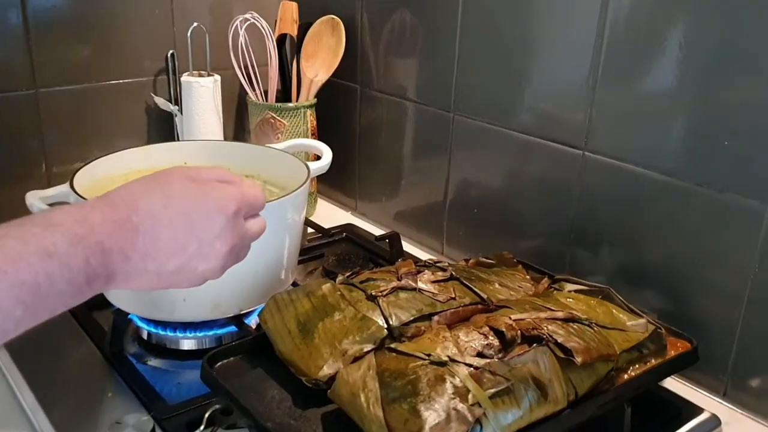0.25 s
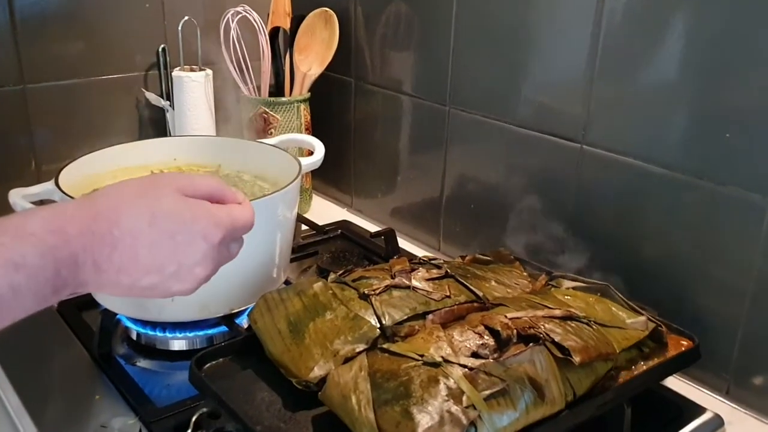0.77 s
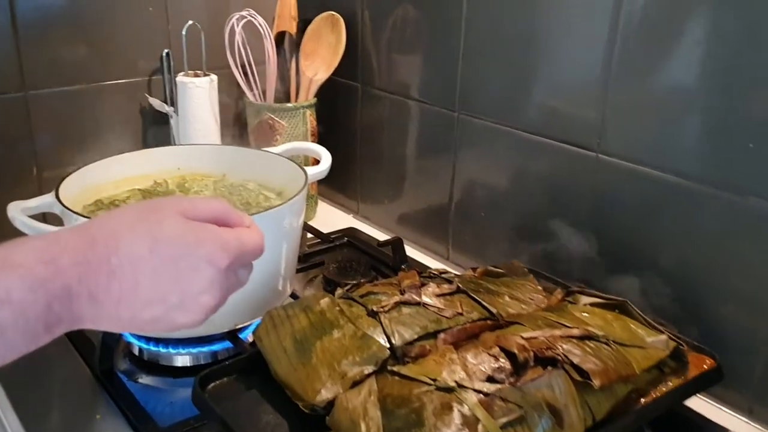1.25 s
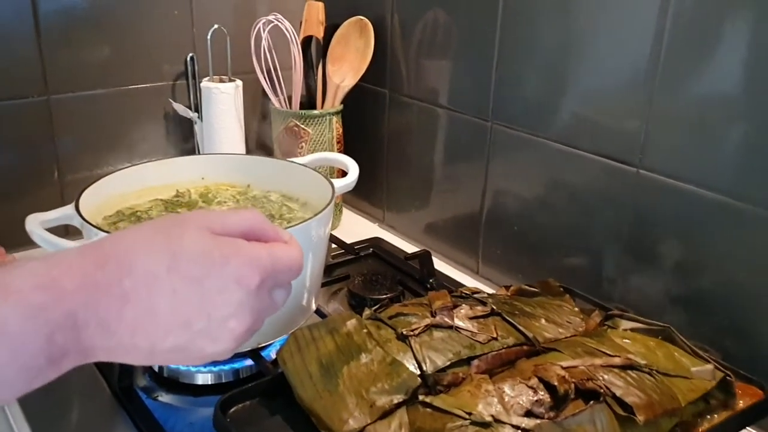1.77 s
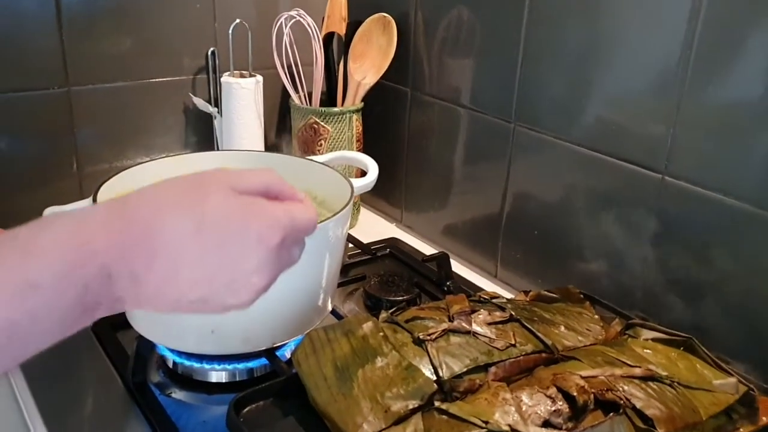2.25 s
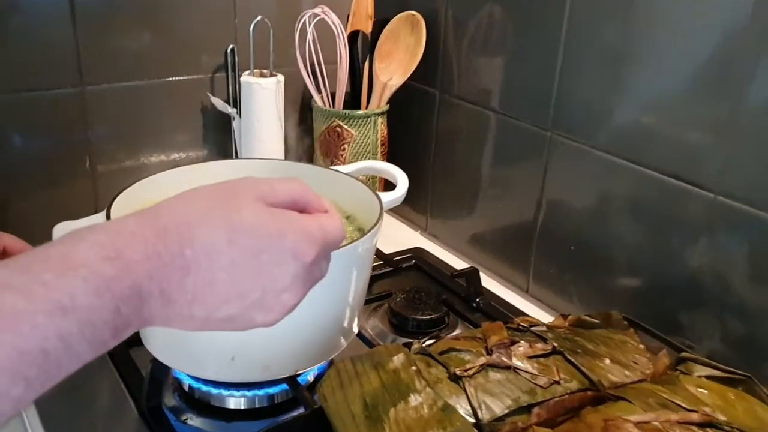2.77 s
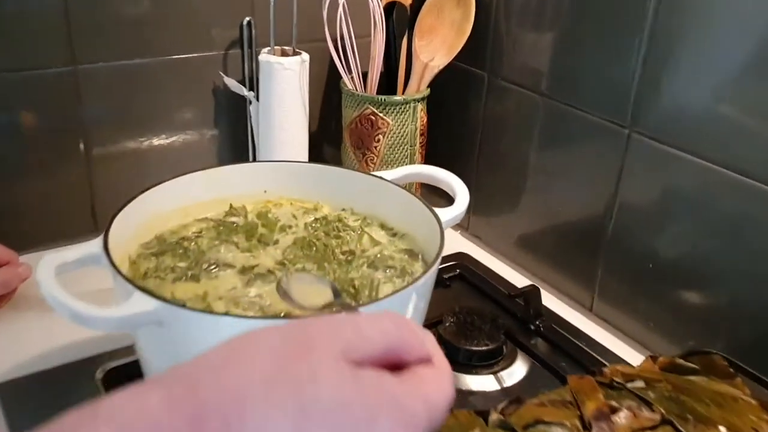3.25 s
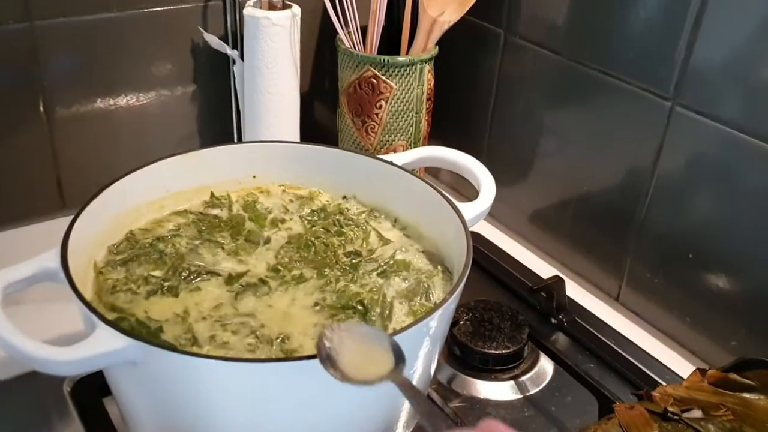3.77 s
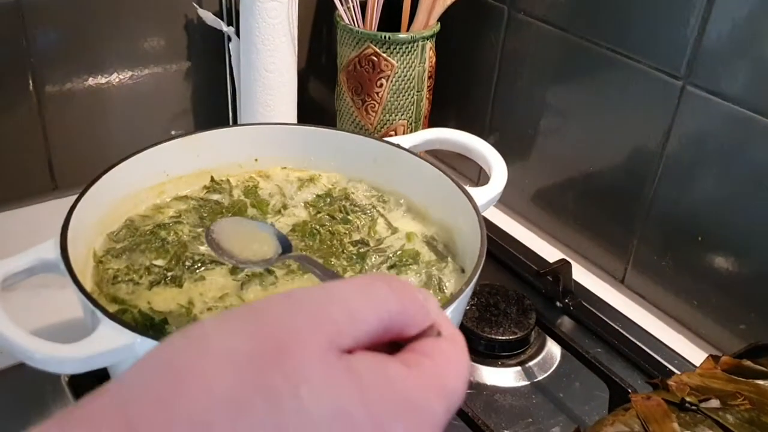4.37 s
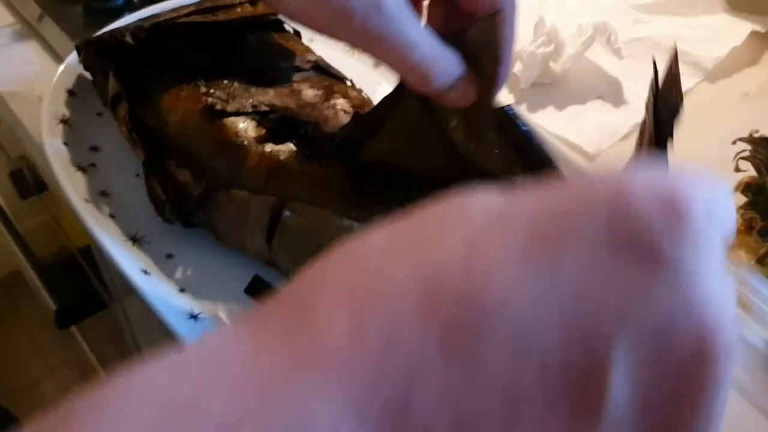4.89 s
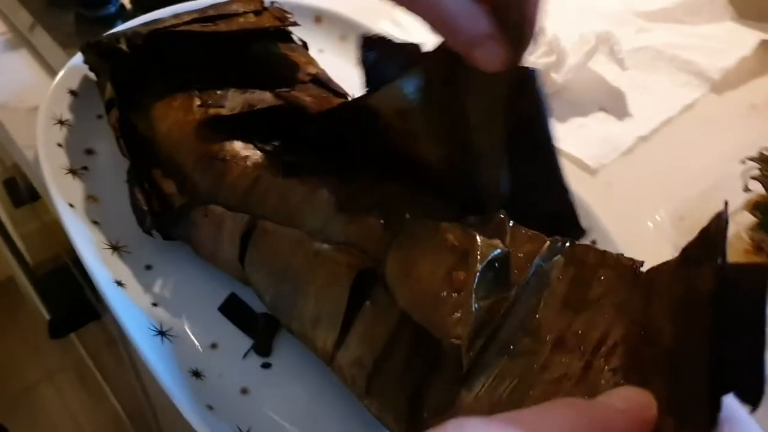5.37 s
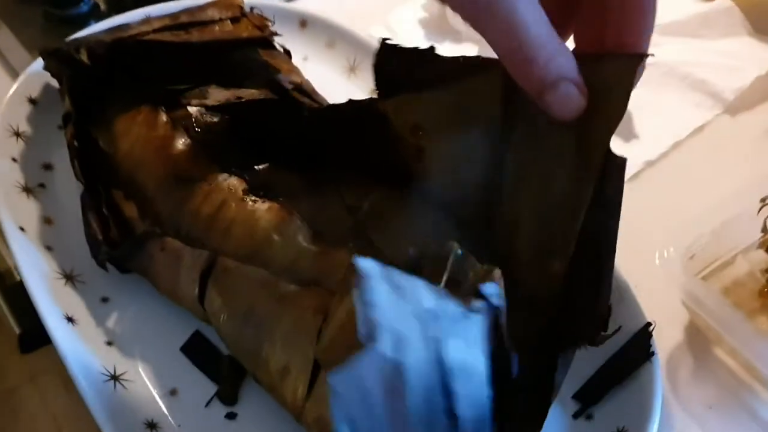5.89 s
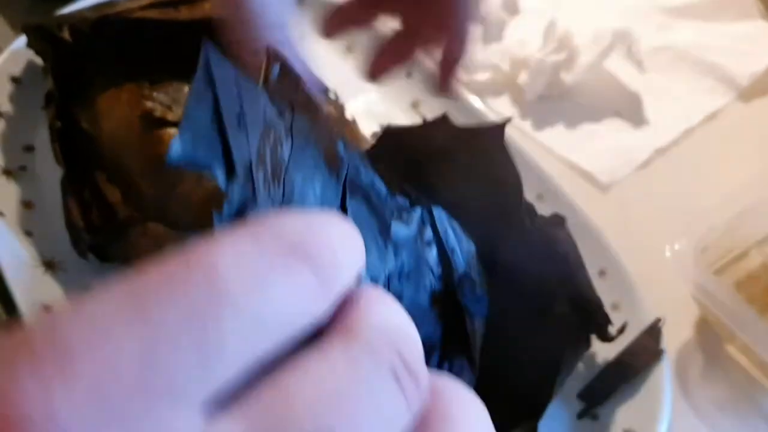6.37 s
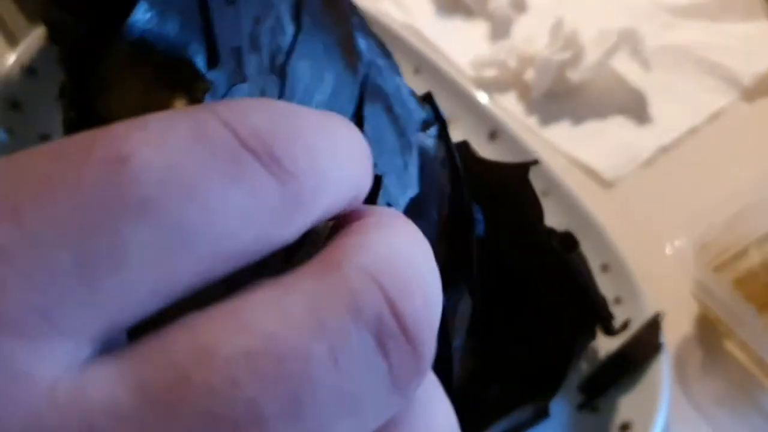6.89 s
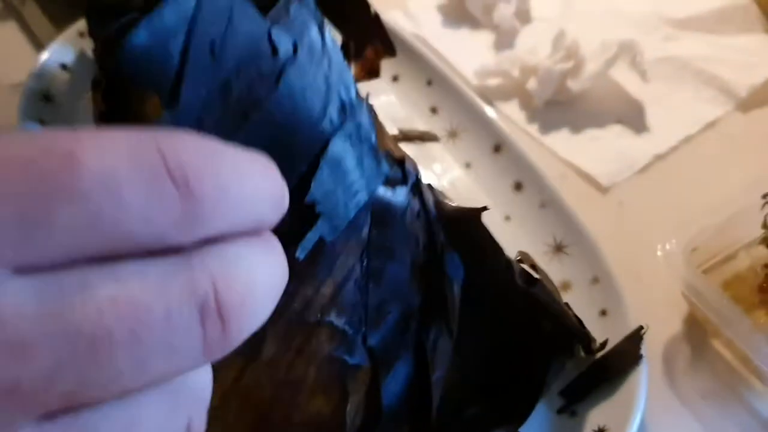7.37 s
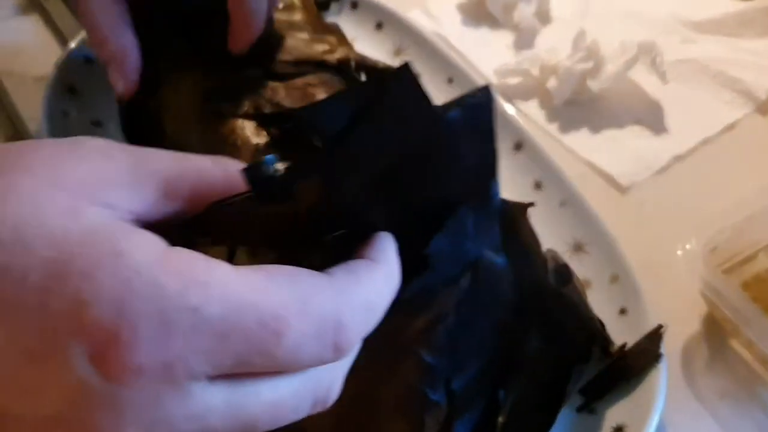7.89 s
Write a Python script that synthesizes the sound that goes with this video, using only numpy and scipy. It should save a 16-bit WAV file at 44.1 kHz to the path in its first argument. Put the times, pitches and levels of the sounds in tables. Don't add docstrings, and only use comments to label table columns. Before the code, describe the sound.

Soft gas hiss and simmer in a tiled kitchen, a sudden loud metal clatter, light ticks and a wooden knock, then close crisp leaf snapping.

```python
import sys
import numpy as np
from scipy import signal
from scipy.io import wavfile

SR = 44100
rng = np.random.default_rng(int(sys.argv[2]) if len(sys.argv) > 2 else 0)


def gain_from_db(level_db):
    decades = np.asarray(level_db, float) / 20
    return 10 ** decades


def wav_out(sig):
    wavfile.write(sys.argv[1], SR, np.round(np.clip(np.atleast_2d(sig).T, -1, 1) * 32767).astype(np.int16))


N = 358533

# [from f/Hz, to f/Hz]
BLOW_BANDS = [(200, 700), (700, 2600), (2600, 7000), (7000, 14600)]
# [from f/Hz, to f/Hz]
KNOCK_BANDS = [(140, 450), (450, 1450), (1450, 4500), (4500, 16000)]
HARDNESS_SHARE = [0.002, .6, .95, 1.05]

TUMBLE = [(0.612, -14, 0.5), (0.624, -19, -6.5), (0.659, -31.5, -1), (0.721, -12.5, -6.5),
          (0.789, -37.5, 7), (0.874, -15.5, -1), (0.907, -18, 4.5), (0.959, -26, -12), (0.999, -34, -1.5)]
# [t/s, level/dB, hardness/dB]
JOSTLE = [(1.071, -28, 23.5), (1.111, -17.5, -11), (1.203, -17.5, 1.5), (1.257, -18.5, 4.5),
          (1.3, -38, -1.5), (1.339, -18, 2)]
# [t/s, level/dB, hardness/dB]
DROP = [(1.404, -15, -12), (1.4205, -10.5, 11), (1.433, -5.5, -4.5), (1.451, -15, 0), (1.469, -14, -5),
        (1.498, -18, 0), (1.539, -24, 5)]
# [t/s, level/dB, hardness/dB]
BOUNCES = [(1.58, -19, -16), (1.657, -18.5, -16), (2.19, -31, -16), (2.249, -27.5, -25)]
# [t/s, level/dB, hardness/dB]
BRUSH = [(.045, -48, 6.5), (.06, -43.5, 0.55)]
# [t/s, level/dB, hardness/dB]
TICKS = [(3.266, -41, 10), (3.359, -37.5, -17), (3.475, -48, -9)]
# [t/s, level/dB, hardness/dB]
KNOCKS = [(3.969, -58.5, 15), (4.118, -38.5, 0.5), (4.167, -22, -2.5), (4.205, -26, -7)]
# [t/s, level/dB, hardness/dB]
DISH = [(6.631, -53, 0.5), (6.876, -51, 2.5), (7.204, -44, 4.5), (7.219, -39, -18), (7.544, -34, -10),
        (7.589, -33.5, -25), (7.657, -35.5, -27), (7.699, -38.5, -13), (8.119, -45, -12.5)]

UTENSIL_MODES = [(310.5, -6.5, 0.057), (419, -5, 0.026), (595, -4, 0.076), (700, -3.5, 0.072),
                 (1010, -3.5, 0.051), (1257, -1.5, 0.034), (2100, -15.5, 0.04), (2920, -17.5, 0.027),
                 (5200, -10.5, 0.023), (7010, -2.5, 0.031), (9600, -5, 0.028), (10230, -7, 0.025)]
# [f/Hz, level/dB, t60/s]
TRAY_MODES = [(205.6, -26.5, 0.015), (297, -26.5, 0.081), (298, -9.5, 0.043), (515, -19.5, 0.067),
              (1100, -1.5, 0.021), (1240, -15, 0.025), (1350, 4, 0.03), (1500, -5, 0.033),
              (2073, -11, 0.073), (2400, -0.5, 0.0068), (3800, -8, 0.02), (6400, -4, 0.044)]
# [f/Hz, level/dB, t60/s]
DROPPED_MODES = [(96, -13.5, 0.094), (200, -2, 0.044), (299, -5.5, 0.22), (381, -10, 0.078),
                 (980, -5, 0.012), (2120, -10, 0.026), (3840, 6.5, 0.0044)]
# [f/Hz, level/dB, t60/s]
WIRE_MODES = [(430, -11.5, 0.037), (727, -0.5, 0.018), (940, -2.5, 0.047), (5260, -5.5, 0.056),
              (5510, -14, .03), (7000, -6, 0.048)]
# [f/Hz, level/dB, t60/s]
SPOON_MODES = [(1250, -6, .025), (1550, 0, .022), (1890, -1, .02), (3230, -3, .018), (4400, -7, .01),
               (5850, -6, .01), (8100, -3, .012)]
# [f/Hz, level/dB, t60/s]
WOOD_MODES = [(200, -6, .04), (500, -3, .025), (640, -3, .02), (820, -2, .02), (1040, -6, .015),
              (1300, -12, .015), (2500, -7, .01), (3400, -5, .012)]

# [start t/s, hold t/s, drum tone level/dB]
WOBBLE = [(1.865, 0.2, -36.5), (2.147, .01, -45.5), (2.237, 0.083, -39), (2.416, .01, -51)]
# [t/s, peak level/dB, final f/Hz]
HOLLOWS = [(0.91, -40, 1240), (1.073, -24, 1300), (1.256, -21, 1308), (1.338, -19, 1272),
           (1.654, -26, 1320), (1.723, -24, 1320), (1.776, -21.5, 1334), (1.82, -27, 1290),
           (1.875, -28, 1346)]
# [t/s, peak level/dB, f/Hz,
# t60/s]
RINGING = [(.613, -19, 489.5, 0.073), (.62, -29.5, 693, 0.24), (.718, -10.5, 360, 0.056),
           (.785, -27.5, 340, 0.26), (.876, -28, 765, 0.099), (0.913, -24, 432, 0.19),
           (.955, -22.5, 413, 0.18), (0.906, -27.5, 1678, 0.24), (0.958, -36, 1190, 0.13),
           (1.074, -28.5, 297, 0.15), (1.107, -32.5, 299, 0.34), (1.202, -24, 336, 0.064),
           (1.205, -30.5, 710, 0.089), (1.259, -32, 304, 0.32), (1.262, -23.5, 753, 0.078),
           (1.34, -26, 314, 0.065), (1.343, -24.5, 756, 0.089), (1.338, -39.5, 5200, 0.09),
           (3.267, -36, 1630, .06), (3.265, -37, 3260, 0.027), (3.267, -32, 4500, .04),
           (3.268, -36, 5900, .04), (3.293, -46, 3210, .08), (3.31, -37, 1200, .06), (3.48, -48, 1320, .1),
           (3.665, -42, 3750, 0.065), (1.721, -32, 2240, 0.11), (1.776, -32.5, 2293, 0.11),
           (1.822, -35, 2180, .12), (1.862, -43, 2130, 0.08), (1.721, -43, 3800, .08),
           (1.78, -44, 3800, .1), (1.421, -16.5, 2680, 0.058), (1.658, -25, 1443, 0.092),
           (1.58, -30.5, 217, 0.19), (1.658, -40, 203, 0.18), (1.721, -35, 230, 0.29),
           (1.78, -36.5, 200, 0.2), (1.861, -30.5, 238, 0.15), (1.958, -50, 200, 0.36),
           (2.201, -44, 1028, 0.33), (3.352, -40, 1770, 0.087), (3.598, -37.5, 3800, 0.073),
           (4.118, -31, 700, 0.08), (4.168, -40, 3340, 0.045), (6.632, -39, 670, 0.045),
           (7.2, -58, 1210, 0.14), (7.212, -40, 813, 0.075), (7.218, -40.5, 2480, 0.068),
           (.613, -34, 7150, .2), (0.872, -35, 6800, 0.14), (.874, -36.5, 10000, .04),
          (0.905, -30.5, 5200, 0.15), (0.909, -37, 7150, 0.21), (1.073, -32, 8100, .035),
          (1.203, -36.5, 7050, .06), (1.256, -39.5, 5320, 0.23), (2.191, -53, 5260, 0.29)]
# [t/s, peak level/dB, f/Hz, swell t/s]
BUMPS = [(2.485, -43, 205, .012), (2.53, -36, 200, .016), (2.535, -49, 395, .025), (3.662, -30, 72, .015),
         (3.715, -36, 72, .012), (6.37, -46, 55, .02), (6.435, -46, 130, .008), (6.343, -50, 150, .01),
         (6.385, -52, 230, .012), (6.41, -49, 85, .012), (7.54, -43, 60, .015), (7.66, -45, 155, .04),
         (3.608, -49, 2570, .009)]

# [t/s, peak level/dB, f/Hz, spray level/dB, top level/dB]
SNAPS = [(5.064, -25.5, 2530, -5.5, 3), (5.201, -30, 3800, -17, -8), (5.251, -42, 2460, 1, 2),
         (5.3112, -29.5, 2400, -22, 14.5), (5.5362, -46, 2130, 2, -15), (5.5596, -31, 6400, -17, -2),
         (5.7475, -25, 6860, -14, 1), (5.802, -43, 7500, 3, 5), (5.8237, -26, 5800, -7, 2.5),
         (5.881, -35, 2400, -8, 9), (5.9106, -32.5, 6200, -8, 0), (5.993, -34, 4550, -12, -4),
         (6.007, -18.5, 6100, -20, -9), (6.0263, -28, 6150, -19, 3), (6.1004, -42, 4300, -15, 9),
         (6.2427, -28, 1550, -20.5, -17), (6.633, -37, 1700, -23, -10), (6.8367, -29, 7000, -22, -7),
         (6.8823, -46, 1190, 4, -3), (6.904, -35, 4070, -8, 10.5), (7.1057, -27, 2520, -7, 5.5),
         (7.173, -28.5, 2980, -18, 0), (7.201, -30, 1480, 2.5, 0), (7.219, -23, 1930, -20, -13),
         (7.476, -32, 5800, -10, -0.5), (7.5483, -41, 4000, -14.5, 7), (7.5727, -41, 3560, 2, 12),
         (7.595, -23.5, 1650, -14.5, 6), (7.7187, -15.5, 5200, -17, -2.5), (7.8348, -29, 4870, -41, 2)]
# [t/s, peak level/dB, f/Hz]
CREAKS = [(4.951, -25.5, 5570), (4.975, -30, 3190), (5.014, -44, 4470), (5.094, -37, 2400),
          (5.475, -46, 4580), (5.654, -38, 5600), (5.7213, -43, 11100), (5.8173, -40, 5000),
          (5.829, -37, 4000), (6.0645, -37, 3520), (6.168, -49, 5500), (6.195, -41, 3870),
          (6.269, -49, 5940), (6.295, -46, 6900), (6.3286, -39.5, 3700), (6.415, -40.5, 4060),
          (6.4393, -46, 11000), (6.6783, -38, 1900), (6.747, -34, 6760), (6.7593, -37, 5900),
          (6.9684, -32.5, 1580), (7.014, -32, 5500), (7.3383, -41, 4540), (7.449, -44, 3800),
          (7.7104, -22, 6800), (7.8793, -49, 3890), (7.896, -36, 3800), (7.918, -33, 6750),
          (7.9887, -39.5, 3250), (8.0335, -35.5, 3950), (8.076, -60, 4100)]
# [middle t/s, peak level/dB, f/Hz, length t/s, top level/dB]
CRUMBLES = [(5.061, -36, 3800, 0.0034, 8), (5.094, -50, 2970, 0.0059, -3), (5.201, -36, 3920, .002, -12),
            (5.27, -43, 2500, .009, -8), (5.315, -42, 3500, 0.0044, 9), (5.828, -37, 4500, 0.004, 0),
            (5.856, -52, 4000, 0.0053, -3), (6.105, -44.5, 5000, 0.0024, 9), (6.247, -43, 5800, 0.0017, -8),
            (6.289, -51, 5900, .008, -5), (6.624, -50, 1500, 0.01, -10), (6.686, -48, 6500, .004, 2),
            (6.839, -40, 6740, 0.0027, 4), (6.887, -48, 1100, 0.016, -18), (6.91, -48, 3500, 0.0043, -3),
            (6.974, -50.5, 3500, .004, 4), (7.02, -48, 4000, 0.0064, -2), (7.064, -47, 5500, 0.0026, -1),
            (7.113, -42, 4200, 0.0052, 4)]
# [t/s, rustle level/dB]
PEELING = [(4.83, -60), (4.94, -67), (5.06, -57.5), (5.28, -58), (5.45, -74), (5.6, -80.5), (5.85, -57.5),
           (5.97, -71), (6.4, -63), (6.58, -64), (6.68, -59.5), (7.09, -61), (7.22, -51), (7.4, -67),
           (7.58, -58.5), (7.8, -53.5), (7.95, -63.5), (8.13, -68.5)]
# [f/Hz, level/dB per Hz]
LEAF = [(410, -17), (700, 1), (961, -3.5), (1130, 0), (1610, -3.5), (3160, -5), (6800, -6.5), (7970, -13),
        (14800, -14.5), (15900, -18), (16500, -34)]

# [t/s, hiss level/dB]
STOVE = [(0, -59), (.04, -55.5), (.6, -53), (2.4, -55), (2.7, -53), (3.1, -50.5), (3.7, -49), (4.2, -53),
         (4.83, -53.5)]
# [t/s, level/dB]
SHUDDER = [(.6, -70), (1.0, -44), (1.7, -41.5), (2.1, -49.5), (2.5, -61)]
# [f/Hz, level/dB per Hz]
HISS = [(940, -23), (1600, -2), (2250, -2.5), (2790, -20.5), (3260, 4), (3490, 0), (5750, -2.5), (7410, -6),
        (14000, -8), (15900, -20), (16500, -52.5)]
# [f/Hz, level/dB per Hz]
ROAR = [(71, -21.5), (120, -13.5), (171, -11.5), (278, 2.5), (479, -12), (565, -4), (905, -5.5),
        (1140, -11.5), (1390, -11), (2500, -40.5), (3250, -41.5), (5500, -120)]
# [f/Hz, level/dB per Hz]
RUMBLE = [(15, -38.5), (25, -16), (44, 4), (65, 1), (123, 5), (167, -26.5), (200, -23.5), (260, -44),
          (440, -120)]
# [t/s, rumble level/dB]
HANDLING = [(0, -58.5), (.5, -56), (1.0, -50), (1.5, -49.5), (2.0, -61.5), (2.9, -54), (3.1, -51.5),
            (3.9, -49.5), (4.05, -57.5), (4.25, -51), (4.85, -58.5), (5.6, -66), (5.8, -58), (6.1, -60.5),
            (6.4, -59.5), (7.4, -60), (7.6, -55), (8.13, -62.5)]
# [f/Hz, level/dB per Hz]
MURMUR = [(71, -34), (120, -4.5), (294, -6), (340, -5.5), (392, 10.5), (654, -42.5), (1200, 5),
          (1560, -46.5), (2640, -120)]
# [f/Hz, left-right likeness]
LIKENESS = [(40, 0.96), (125, 0.98), (250, 0.8), (500, 0.99), (1000, 0.044), (4000, 0.0042), (12000, 0.073)]
# [f/Hz, t60/s]
KITCHEN_T60 = [(130, 0.28), (1000, 0.59), (4000, 0.56), (12000, 0.2)]

LEFT_BIAS_DB = 2.5


def tumbling_utensils():
    return blows(TUMBLE, UTENSIL_MODES, ring_db=-8.5, crack_db=-4.0, crack_t60=0.049, rise_s=.0018,
                 scatter_db=2.5, wet_db=-0.5, colour_db=[-1, -4, -12, -8])


def jostling_rack():
    return blows(JOSTLE, TRAY_MODES[:4] + UTENSIL_MODES[7:], ring_db=0.0, crack_db=-2.5, crack_t60=0.065,
                 rise_s=.0025, scatter_db=1.5, wet_db=0.0, colour_db=[-6.0, -12.5, -16.0, -21.5])


def dropped_tray():
    return blows(DROP, DROPPED_MODES, ring_db=-8.0, crack_db=-11.5, crack_t60=0.14, rise_s=0.0031,
                 scatter_db=-2.5, wet_db=-7.5, colour_db=[-4.0, -2.0, -3, -7.0])


def rocking_tray():
    k = np.arange(10)
    gap_s, extra_gap_s, shrink = .023, .033, .72
    s = 1.722 + gap_s * k + extra_gap_s * (1 - shrink ** k) / (1 - shrink)
    strength_db, hardness_db = -20 - 1.5 * k, -1 - 3 * k
    touches = sorted(BOUNCES + list(zip(s, strength_db, hardness_db)))
    return blows(touches, TRAY_MODES, ring_db=-3.0, crack_db=-11.0, crack_t60=0.056, rise_s=0.005,
                 scatter_db=2.5, wet_db=-1.5, colour_db=[1.5, -1.5, -6.5, 0.0])


def brushing_wire():
    return blows(BRUSH, WIRE_MODES, ring_db=0, crack_db=-7.0, crack_t60=0.057, rise_s=0.0047,
                 scatter_db=7.0, wet_db=-2.5, colour_db=[5.5, 0.5, 2.0, 1.8])


def ticking_spoon():
    return blows(TICKS, SPOON_MODES, ring_db=0, crack_db=-5, crack_t60=.04, rise_s=.0008,
                 scatter_db=1.2, wet_db=-9, colour_db=[-1.0, 1, 3.0, -5])


def cupboard_door():
    return blows(KNOCKS, WOOD_MODES, ring_db=-7, crack_db=-3, crack_t60=.07, rise_s=.003,
                 scatter_db=1.3, wet_db=-1.5, colour_db=[-4, 3.5, -2, -17.0], bands=KNOCK_BANDS)


def touched_dish():
    return blows(DISH, WOOD_MODES, ring_db=-4, crack_db=-3, crack_t60=.12, rise_s=.006,
                 scatter_db=1.3, wet_db=-6, colour_db=[-1.0, 6.5, 3.0, 3.5], bands=KNOCK_BANDS)


def blows(events, modes, ring_db, crack_db, crack_t60, rise_s, scatter_db, wet_db, colour_db,
          bands=BLOW_BANDS):
    rows = np.array(events)
    band_db = rows[:, [1]] + np.array(colour_db) + rows[:, [2]] * np.array(HARDNESS_SHARE)
    start = int(rows[0, 0] * SR) - 10
    size = min(N, int((rows[-1, 0] + .6) * SR)) - start
    at = np.minimum((rows[:, 0] * SR).astype(int) - start, size - 1)
    scatter = np.clip(rng.standard_normal((len(rows), len(modes))), -1, 1)
    crack, rings = np.zeros((2, 2, N))

    def burst(peak_db, t60, rise):
        clicks = np.zeros(size)
        clicks[at] = gain_from_db(peak_db)
        fall, build = gain_from_db(-60 / (t60 * SR)), np.exp(-1 / (max(rise, 1e-4) * SR))
        return signal.lfilter([1 - build], np.convolve([1, -fall], [1, -build]), clicks + 1e-18)

    for k, (low, high) in enumerate(bands):
        slower = (1000 / low) ** 0.013
        white = band(rng.standard_normal((2, size)), low, high)
        noise = rms_one(pair(white, np.sqrt(low * high)))
        noise = noise * burst(band_db[:, k] + crack_db, crack_t60 * slower, rise_s * slower)
        crack[:, start:start + size] += band(band(noise, low, high), low, 2 * high)

    for m, (hz, level_db, t60) in enumerate(modes):
        k = min(np.searchsorted(np.array(bands)[:, 1], hz), 3)
        strength_db = band_db[:, k] + level_db + ring_db
        for detune in 1 + min(.025, 70 / hz) * np.array([-1, 0, .8]):
            if hz < 1050:
                push = burst(strength_db - 17, .001, .00015) * np.ones((2, 1))
                push = band(push, hz / 1.35, hz * 1.35)
                push[1] = np.roll(push[1], 14)
            else:
                chatter = pair(rng.standard_normal((2, size)), hz)
                push = chatter * burst(strength_db + scatter_db * scatter[:, m] - 21.5, 0.024, rise_s)
            rings[:, start:start + size] += ring(push, hz * detune, t60)

    direct = crack + rings
    walls = gain_from_db(wet_db) * (crack + 1.3 * rings)
    return np.array([direct, walls]) * sides(LEFT_BIAS_DB + 0.5)[:, None]


def wobble():
    t = np.arange(N) / SR
    drone = rms_one(ring(rng.standard_normal(N), 280, 0.045)) + 1.1 * np.sin(2 * np.pi * 302 * t)
    rise_db_per_s, fall_db_per_s = 401, 224
    swell = 0
    for s, hold, db in WOBBLE:
        before, after = np.maximum(s - t, 0), np.maximum(t - s - hold, 0)
        swell = swell + gain_from_db(db - rise_db_per_s * before - fall_db_per_s * after)
    return swell * rms_one(drone) * sides(LEFT_BIAS_DB + 1.5)[:, None]


def hollows():
    out, size = np.zeros(N), 6000
    t = np.arange(size) / SR
    start_ratio, drop_s, rise_s, t60_s = 1.36, 0.012, 0.02, .07
    for s, db, hz in HOLLOWS:
        pitch = hz * (1 + (start_ratio - 1) * np.exp(-(t / drop_s) ** 2))
        shape = 3 * (1 - np.exp(-t / rise_s)) ** 2 * gain_from_db(-60 * t / t60_s)
        rough = 1 + .4 * rms_one(band(rng.standard_normal(size), 30, 300))
        note = np.sin(2 * np.pi * np.cumsum(pitch) / SR)
        out[round(s * SR):round(s * SR) + size] += gain_from_db(db + 5.5) * shape * rough * note
    return out * sides(LEFT_BIAS_DB)[:, None]


def ringing():
    out, size = np.zeros((2, N)), 14000
    t = np.arange(size) / SR
    for s, db, hz, t60 in RINGING:
        shape = (1 - np.exp(-t / 0.0023)) * gain_from_db(db + 1.5 - 60 * t / t60)
        waver = 1 + .36 * rms_one(band(rng.standard_normal((2, size)), 12, 25 + hz / 14))
        tone = np.sin(2 * np.pi * hz * t + [[0], [-hz / 450]])
        out[:, round(s * SR):round(s * SR) + size] += shape * waver * tone
    return out * sides(LEFT_BIAS_DB)[:, None]


def bumps():
    t = np.arange(N) / SR
    out = 0
    for s, db, hz, swell in BUMPS:
        out = out + gain_from_db(db) * np.exp(-.5 * ((t - s) / swell) ** 2) * np.sin(2 * np.pi * hz * t)
    return out


def snaps():
    size = 5000
    out = np.zeros((2, N + size))
    t = np.arange(size) / SR

    def add(s, shape, hz, top_db):
        noise = rng.standard_normal((2, size))
        core = rms_one(band(band(noise, hz / 1.6, hz * 1.43), hz / 1.6, hz * 1.43))
        wide = gain_from_db(-4) * rms_one(band(noise, 1230, 5200))
        top = gain_from_db(top_db - 7 + 4 * np.log2(hz / 4000)) * rms_one(band(noise, 8100, 14300))
        burst = core + wide + top
        out[:, round(s * SR):round(s * SR) + size] += shape * burst * sides(rng.normal(4.1, 0.29))[:, None]

    click = 1.5 * np.exp(-t / .0012) * (1 - np.exp(-t / .0003))
    spray = gain_from_db(-60 * t / 0.089) * (1 - np.exp(-t / 0.0021))
    creaks = [(s, db, hz, -13.5, 1) for s, db, hz in CREAKS]
    for s, peak_db, hz, spray_db, top_db in SNAPS + creaks:
        add(s, gain_from_db(peak_db - 9.5) * (click + gain_from_db(spray_db) * spray), hz, top_db)
    for s, peak_db, hz, length, top_db in CRUMBLES:
        grit = gain_from_db(6.6 * np.repeat(rng.standard_normal(size // 20), 20) - 9.5)
        swell = np.exp(-.5 * ((t - .03) / length) ** 2)
        add(s - .03, gain_from_db(peak_db) * grit * swell, hz, top_db)
    return out[:, :N]


def rustle():
    rustle_db, = in_time(PEELING)
    grip_db, = in_time(HANDLING)
    murmur = gain_from_db(-65 + 0.87 * (grip_db + 60.5)) * (rustle_db > -100)
    born = rng.random(N) < 350 * gain_from_db(7.0 * drift(25)) / SR
    creases = .5 + born * gain_from_db(4.4 * np.minimum(rng.exponential(1, N), 2.2))
    hum = gain_from_db(-75) * rms_one(ring(rng.standard_normal(N), 394.7, 0.84))
    hum = hum * np.clip((np.arange(N) / SR - 4.84) / 0.2, 0, 1)
    room = murmur * coloured(MURMUR, patchy_db=1.0) + hum
    return room + gain_from_db(rustle_db + 4.5) * coloured(LEAF, patchy_db=3.2, grains=creases)


def stove():
    hiss_db, = in_time(STOVE)
    grip_db, = in_time(HANDLING)
    shudder_db, = in_time(SHUDDER)
    since = np.arange(N) / SR - DROP[1][0]
    wash = gain_from_db(-37 - 60 * since / 2) * (since > 0)
    roar = coloured(ROAR, patchy_db=.5)
    for hz, width_hz, level_db in [(290.5, 11.0, -6.5), (555, 55, -9.0), (1380, 66, -11.5)]:
        whistle = rms_one(ring(rng.standard_normal((2, N)), hz, 2.2 / width_hz))
        roar = roar + gain_from_db(level_db) * whistle
    fizz = 1 + (rng.random(N) < 300 / SR) * gain_from_db(11.5)
    hiss = coloured(HISS, patchy_db=.4, grains=fizz)
    rumble = coloured(RUMBLE, patchy_db=.8) * sides(-LEFT_BIAS_DB)[:, None]
    roar_level = np.hypot(gain_from_db(hiss_db - 1.63), gain_from_db(shudder_db))
    return gain_from_db(grip_db) * rumble + roar_level * roar + np.hypot(gain_from_db(hiss_db), wash) * hiss


def kitchen(x):
    t = np.arange(SR) / SR
    tail = 0
    for low in 90 * 2. ** np.arange(8):
        noise = pair(band(rng.standard_normal((2, SR)), low, 2 * low), 0.93 * low)
        tail = tail + noise * gain_from_db(-60 * t / at_hz(KITCHEN_T60, 1.19 * low))
    tail = tail * np.clip((t - .003) / 0.00063, 0, 1)
    return signal.fftconvolve(x, tail / np.sqrt(np.sum(tail ** 2) / 2), axes=1)[:, :N]


def coloured(spectrum, patchy_db, grains=1):
    out, together = 0, drift(0.43)
    lowest, highest = spectrum[0][0], spectrum[-1][0]
    edges = lowest * 2 ** np.arange(0, np.log2(highest / lowest) + .4, .5)
    white = rng.standard_normal((2, 2, N)) * grains
    for k, (low, high) in enumerate(zip(edges, edges[1:])):
        hz = np.sqrt(low * high)
        gain = gain_from_db(at_hz(spectrum, hz) + patchy_db * (.6 * together + drift(14)))
        out = out + gain * pair(band(white[k % 2], low, high), hz)
    return rms_one(out)


def pair(white, hz):
    alike = np.clip(at_hz(LIKENESS, hz), -1, 1)
    return np.sqrt(1 + alike) * white[0] + np.sqrt(1 - alike) * white[1] * [[1], [-1]]


def sides(pan_db):
    return gain_from_db(np.array([pan_db / 2, -pan_db / 2]))


def ring(clicks, hz, t60):
    r, w = gain_from_db(-60 / (max(t60, .002) * SR)), 2 * np.pi * hz / SR
    return signal.lfilter([0, np.sin(w)], [1, -2 * r * np.cos(w), r * r], clicks + 1e-18)


def drift(rate):
    r = np.exp(-80 * np.pi * rate / SR)
    slow = signal.lfilter([1], [1, -2 * r, r * r], rng.standard_normal(N // 40 + 2002))[2000:]
    return np.interp(np.arange(N) / 40, np.arange(len(slow)), rms_one(slow))


def band(x, low, high):
    return signal.sosfilt(signal.butter(2, [low, min(high, .45 * SR)], "band", fs=SR, output="sos"), x)


def at_hz(points, hz):
    return np.interp(np.log(hz), np.log(np.array(points)[:, 0]), np.array(points)[:, 1])


def in_time(rows):
    s, *columns = np.transpose(rows)
    return [np.interp(np.arange(N) / SR, s, c, left=-120, right=-120) for c in columns]


def rms_one(x):
    return x / np.sqrt(np.mean(x ** 2) + 1e-20)


def scene():
    clatter, to_walls = (tumbling_utensils() + jostling_rack() + dropped_tray() + rocking_tray()
                         + brushing_wire() + ticking_spoon() + cupboard_door() + touched_dish())
    cracks = snaps()
    drone = wobble() + hollows() + ringing()
    steady = (stove() + rustle()) * sides(LEFT_BIAS_DB)[:, None]
    echoed = gain_from_db(-9) * (cracks + drone)
    return clatter + cracks + drone + kitchen(to_walls + echoed) + bumps() + steady


def band_limit(x):
    return signal.sosfilt(signal.butter(12, 16810, fs=SR, output="sos"), x)


def record(dry):
    t = np.arange(N) / SR
    fade_out = (4.812 - t) / 0.54
    fade_in = (t - 4.838) / 0.91 + 0.033 * (t > 4.84)
    fade = np.clip(np.maximum(fade_out, fade_in), 0, 1)
    rounded = 0.94 * np.tanh(dry * fade / 0.86)
    top_cut = signal.cheby2(10, 50, 16900, fs=SR, output="sos")
    return band_limit(signal.sosfilt(top_cut, rounded))


dry = scene()
out = record(dry)
wav_out(out)
```